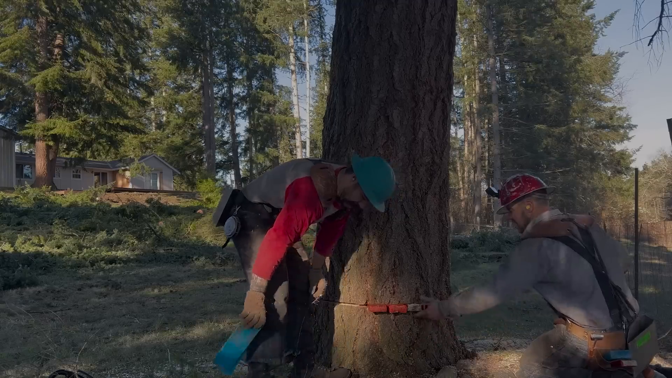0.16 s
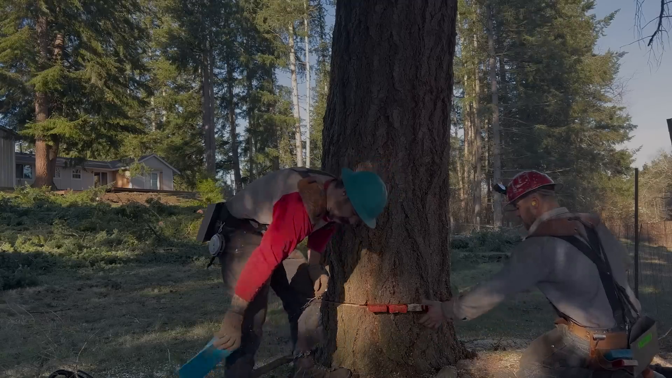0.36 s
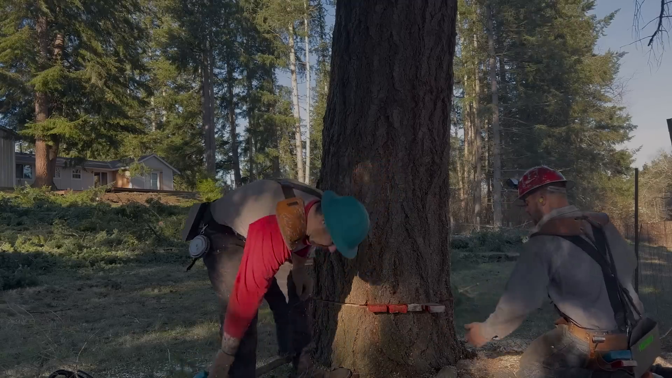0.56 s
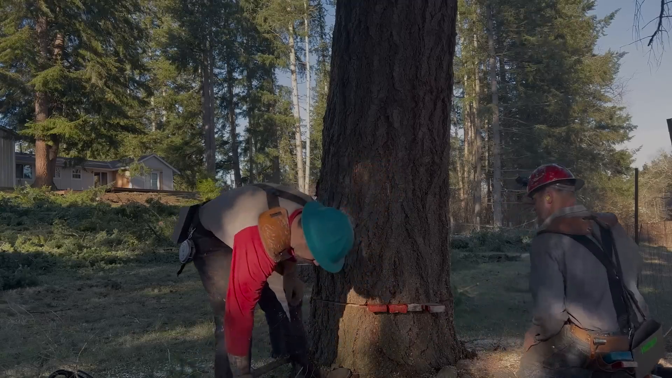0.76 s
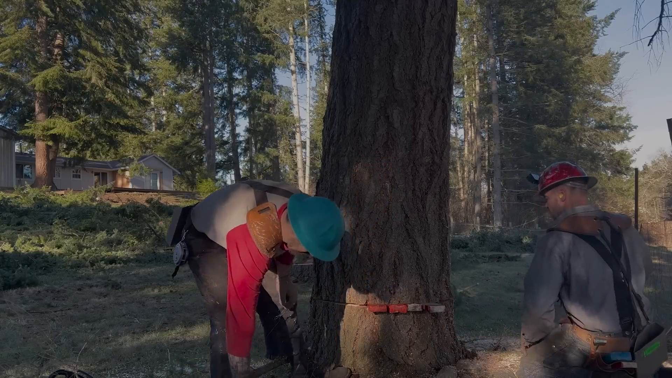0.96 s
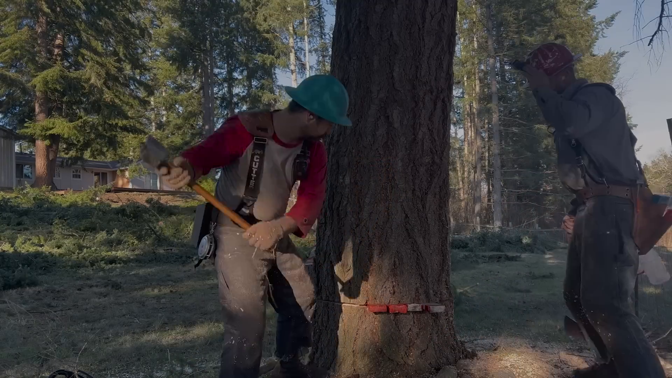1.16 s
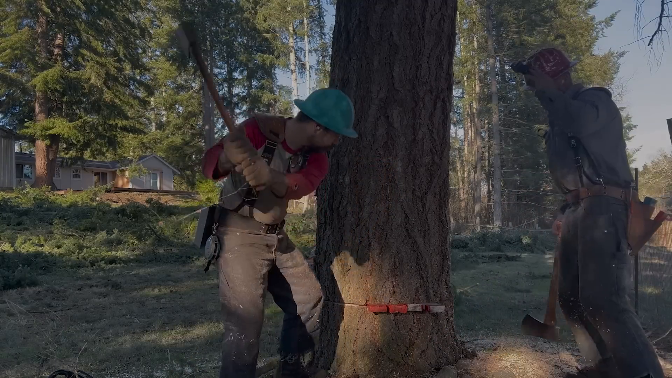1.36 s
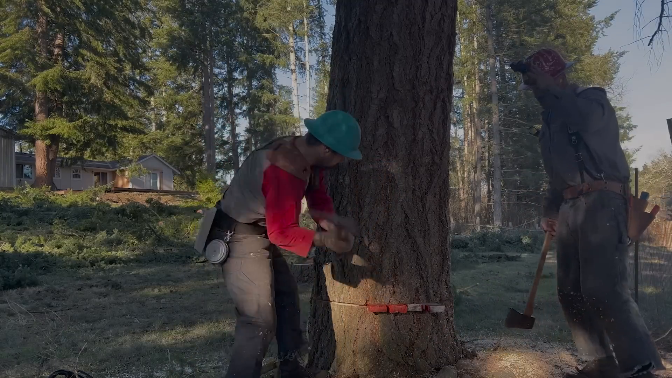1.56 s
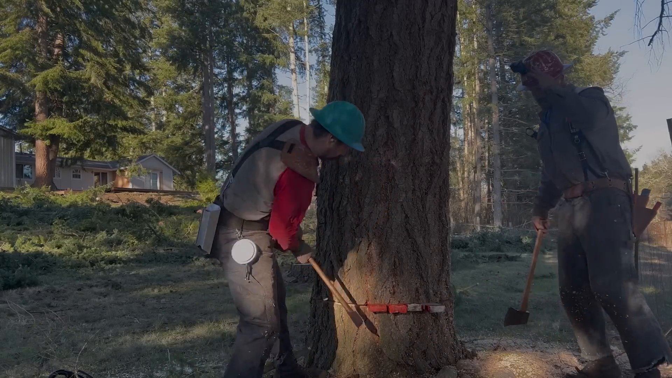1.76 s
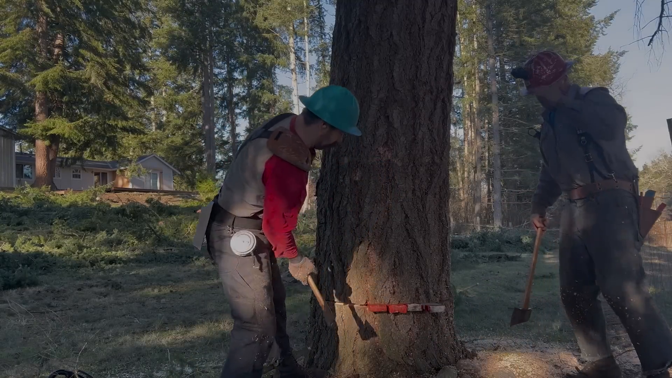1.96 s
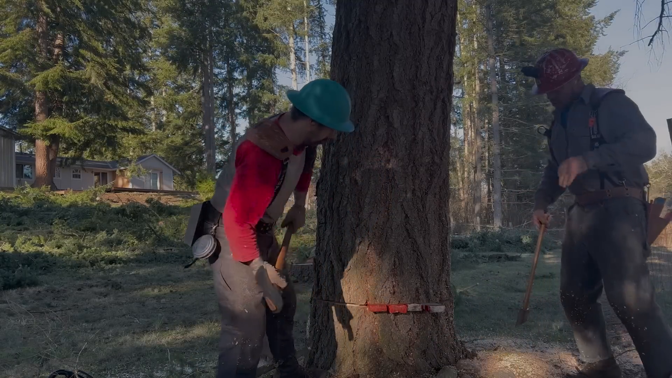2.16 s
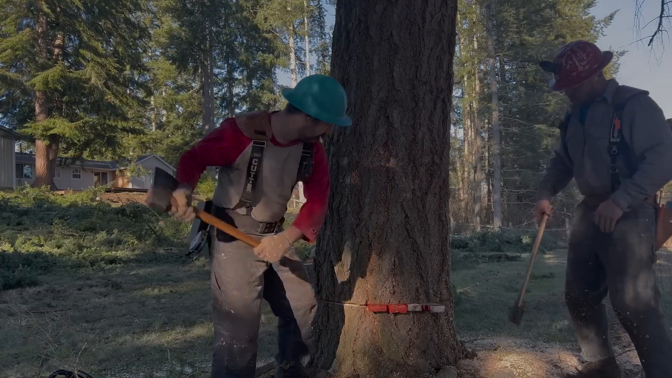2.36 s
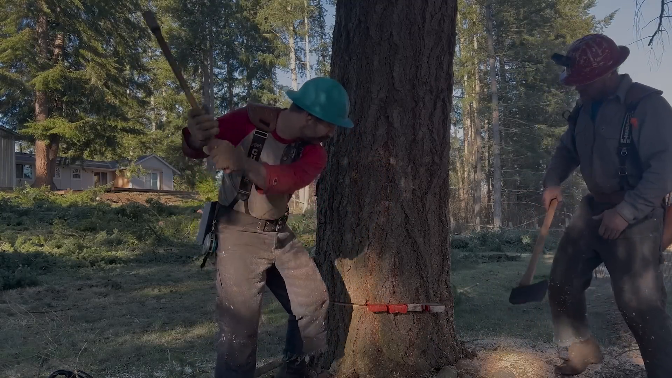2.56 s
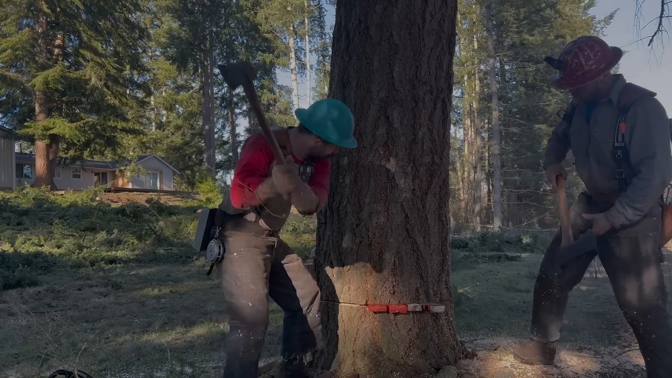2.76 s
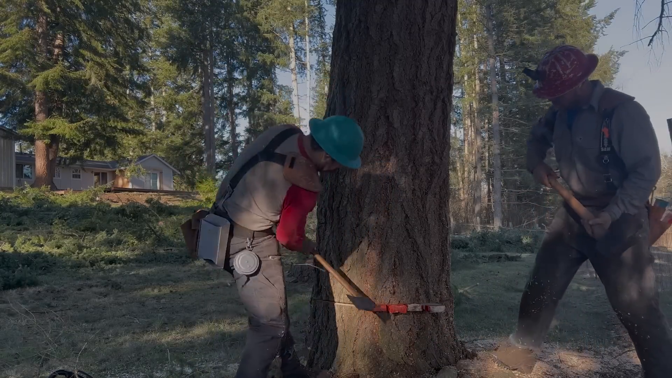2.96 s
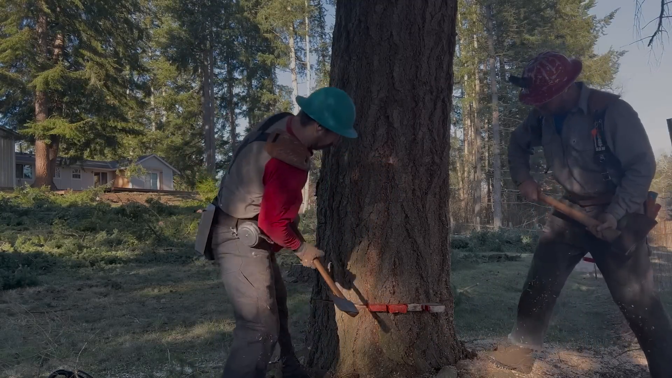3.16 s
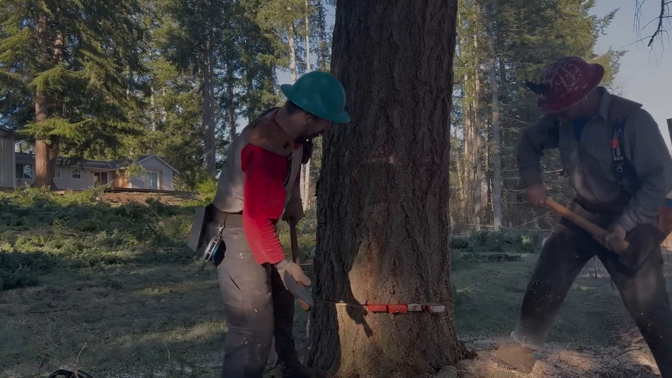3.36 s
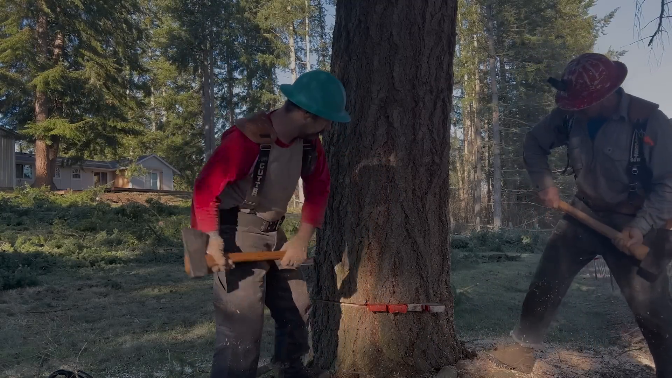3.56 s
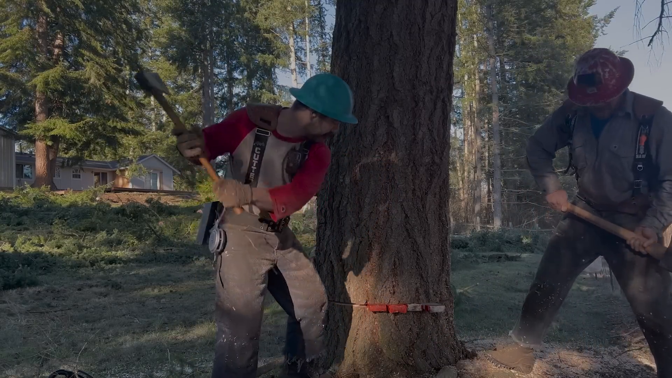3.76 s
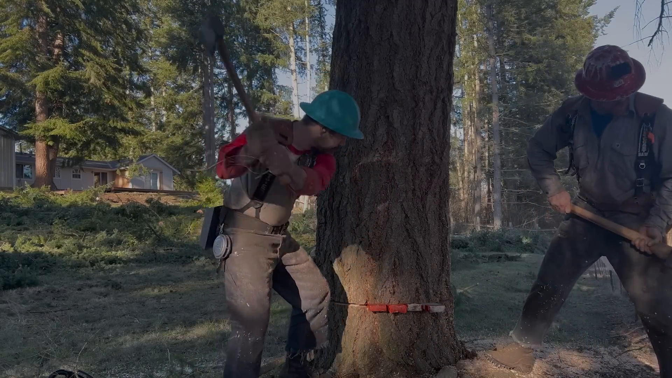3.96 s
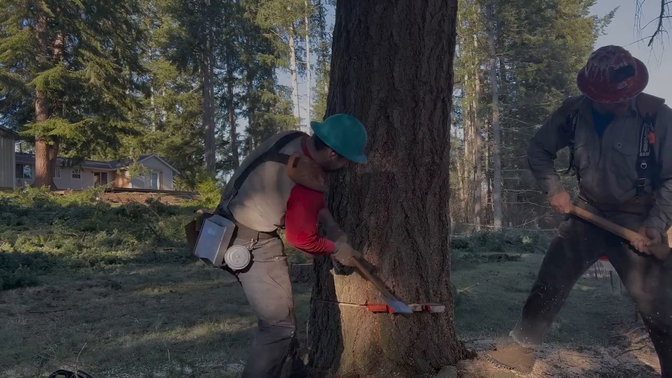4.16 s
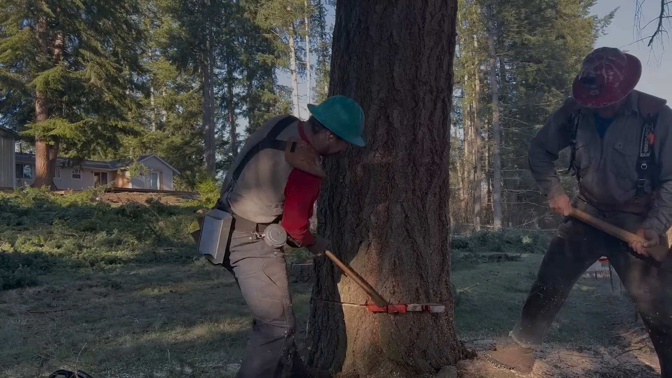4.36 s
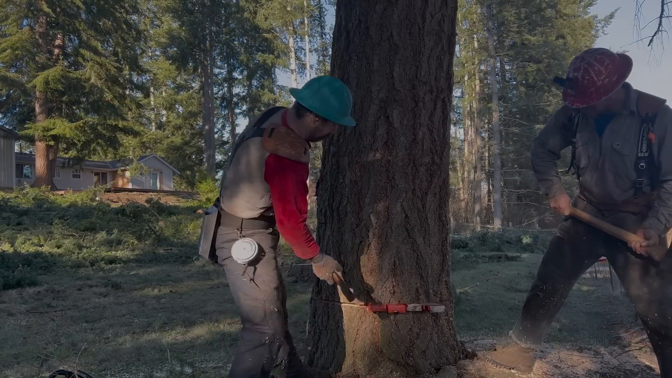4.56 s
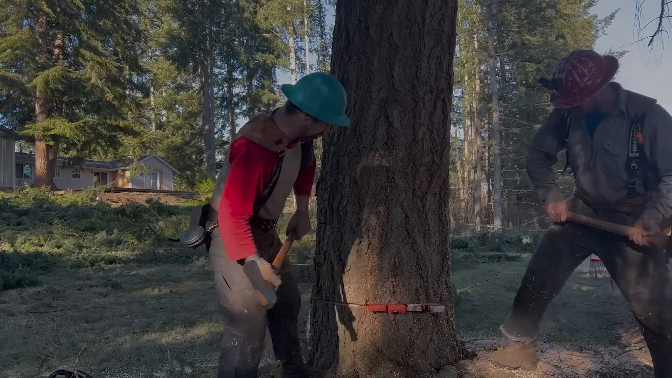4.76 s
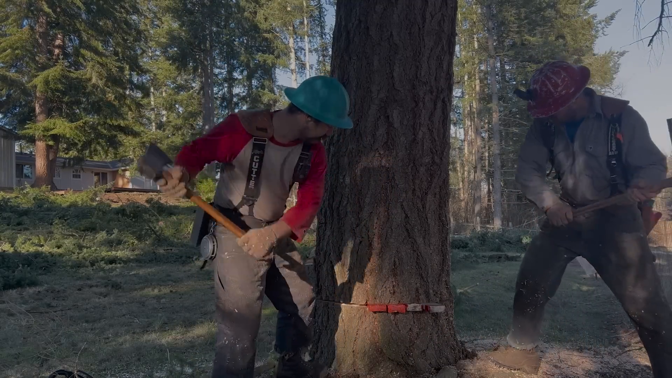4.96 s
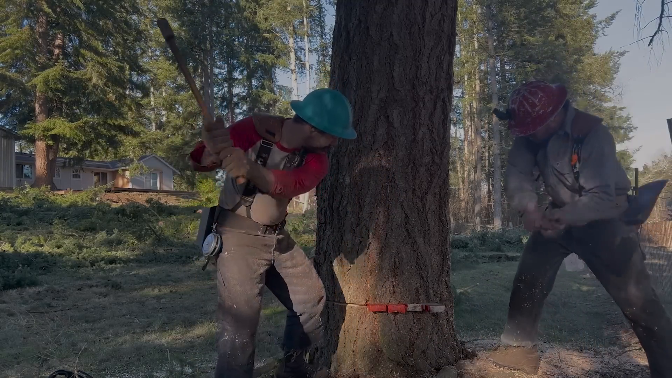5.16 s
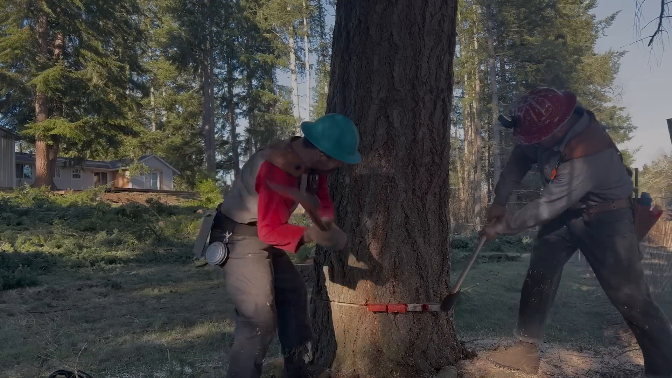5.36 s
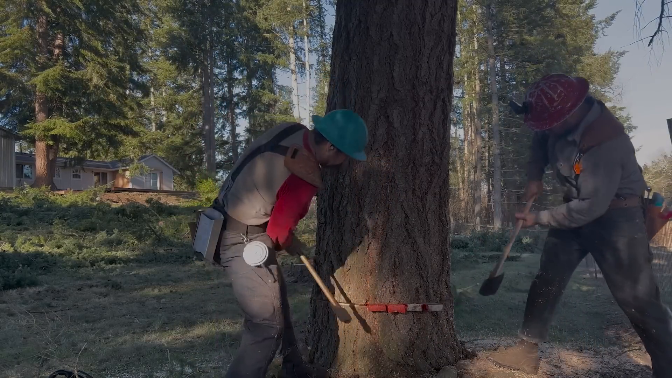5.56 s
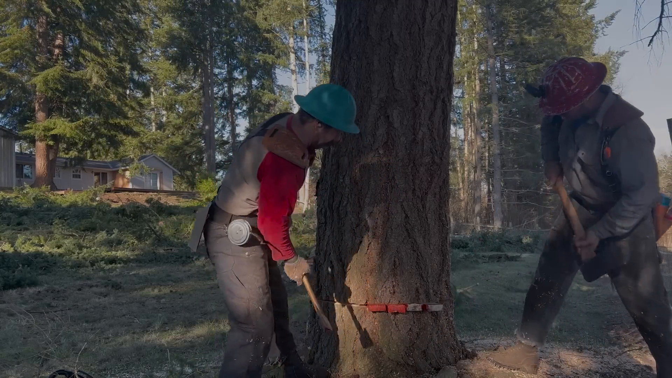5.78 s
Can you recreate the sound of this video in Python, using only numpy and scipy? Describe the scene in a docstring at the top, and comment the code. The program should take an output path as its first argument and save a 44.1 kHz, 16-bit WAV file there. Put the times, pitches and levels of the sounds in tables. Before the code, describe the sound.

Outdoors, wooden-handled axes clunk about before a woody knock runs into each of four sharp wedge strikes, with echoes returning from trees.

```python
"""Wedges driven into a standing fir

Heard in a yard ringed by forest: felling wedges are hit with the back of an axe. Four times a woody knock
(ringing modes and rattle) runs into a hard crack (steel pulse, trunk modes, echoes); one more knock falls between.
Axes and a dropped plastic wedge clunk (modes and rattle), short ticks, snaps and scuffs are clumped noise, boots
thud as short low tones, cloth swishes and a treble echo hisses in noise swells. Behind lie a low rumble, soft air
and faint hiss, all filtered noise; the rumble ends far lower than it began."""
import sys
import numpy as np
from scipy import signal
from scipy.fft import rfft, irfft
from scipy.io import wavfile
from scipy.ndimage import uniform_filter1d, map_coordinates

SR = 44100
rng = np.random.default_rng(int(sys.argv[2]) if len(sys.argv) > 2 else 0)


def transcribe(signal):
    """Save signal, clipped to [-1, 1], as a 16-bit WAV file at the path in sys.argv[1]."""
    frames = np.atleast_2d(signal).T
    limited = np.clip(frames, -1, 1)
    pcm = np.round(limited * 32767).astype(np.int16)
    wavfile.write(sys.argv[1], SR, pcm)


N = 256662  # samples, about 5.8 s

# Hard cracks of axe on wedge; the left channel is louder where pan_db is positive. Columns:
# start_s, level_db, tilt_db_per_octave, chatter_s, trunk_db, echo_db (each echo is set relative to it),
# echo_tilt_db_per_octave (the near trees add to it), pan_db (left minus right), right_lag_ms
CRACKS = [(1.68, -12.5, 2.5, 0.003, -25.5, -34.5, 2, 0, -0.038),
          (2.9615, -14.5, 2.5, 0.0014, -23, -39.5, 0.75, -1.5, -0.054),
          (4.2288, -16, 1.5, 0.0023, -21.5, -42.5, 0.2, -2, -0.061),
          (5.4955, -16.5, 1.1, 0.0026, -22.5, -39.5, -0.7, 0, -0.052)]
# Dying away of sound scattered close by, before each sound's own stretch: hz, t60_s
NEAR_DECAY = [(100, 0.51), (800, .12), (2000, 0.12), (6000, 0.14), (15000, 0.061)]
# Spectrum of fine hiss, for cloth, treble echo and the outdoor hiss: hz, level_db
HISS_COLOUR = [(500, -7.5), (3000, 2), (6000, 3), (9000, 4.5), (10500, -10), (12500, 5), (15500, 1.5),
               (16500, -15)]


def amp(db):
    """Amplitude factor of a level in dB."""
    return 10 ** (np.asarray(db) / 20)


def read(points, hz):
    """Joins points by straight lines on a log-frequency axis."""
    f, value = np.transpose(points)
    return np.interp(np.log(hz + 1), np.log(f + 1), value)


def octaves(hz):
    """Octaves above 1500 Hz, the pivot of every brightness tilt; constant below 200 Hz."""
    return np.log2(np.maximum(hz, 200) / 1500)


def seconds(size):
    """Times of the samples in seconds."""
    return np.arange(size) / SR


def blow(x, db):
    """Gives a sound the energy of 10 ms at this level."""
    energy = np.sum(np.atleast_2d(x) ** 2, 1).mean() + 1e-20
    return x * amp(db) * np.sqrt(.01 * SR / energy)


def add(mix, s, sound, pan_db=0):
    """Puts a sound into the mix at time s, louder on the left by pan_db."""
    sound = sound * amp([[pan_db / 2], [-pan_db / 2]])
    part = mix[:, max(round(s * SR), 0):][:, :sound.shape[1]]
    part += sound[:, :part.shape[1]]


def ports(x, lag_ms):
    """The sound reaches the right microphone a little later, or sooner if the lag is negative."""
    left, right = x * np.ones((2, 1))
    right_times = np.arange(len(right)) - lag_ms * SR / 1000
    return np.array([left, map_coordinates(right, [right_times])])


def noise(colour, size, likeness, tilt_db=0):
    """Coloured stereo noise of rms 1, partly alike in both channels."""
    hz = np.fft.rfftfreq(size, 1 / SR)
    shared, *own = rng.standard_normal((3, size))
    likeness = np.clip(likeness, 0, 1)
    white = np.sqrt(likeness) * shared + np.sqrt(1 - likeness) * np.array(own)
    x = irfft(rfft(white) * amp(read(colour, hz) + tilt_db * octaves(hz)), size)
    return x / x.std()


def fade(x, decay, stretch=1):
    """Lets every band die at its own speed, 60 dB in its t60 times stretch."""
    hz, t, z = signal.stft(x, SR, nperseg=256)
    t60 = stretch * read(decay, hz)[:, None]
    z = z * 1000. ** (-t / t60)
    return signal.istft(z, SR, nperseg=256)[1][:, :x.shape[1]]


def ring(modes, t, tilt_db=0, stretch=1):
    """Damped modes set going by one blow; the grain of the wood gives each a weaker, detuned partner."""
    hz, db, t60 = np.transpose(modes)[:, :, None]
    phase, other_phase, detune = rng.random((3, len(hz), 1))
    partner_hz = hz * (1 + .12 * (detune - .5))  # up to 6 % away
    main = np.sin(2 * np.pi * (hz * t + phase))
    partner = .4 * np.sin(2 * np.pi * (partner_hz * t + other_phase))
    decay = 1000. ** (-t / (t60 * stretch))
    return np.sum(amp(db + tilt_db * octaves(hz)) * (main + partner) * decay, 0)


def rise(t, time):
    """Soft onset lasting about this time in seconds."""
    return 1 - np.exp(-(t / time) ** 2)


def patchy(x, patchy_db):
    """Trunks and boughs scatter unevenly: patches in time and pitch are stronger or weaker."""
    z = signal.stft(x, SR, nperseg=512)[2]
    patches = uniform_filter1d(rng.standard_normal(z.shape[1:]), size=3, axis=0)
    patches = uniform_filter1d(patches, size=5, axis=1)
    gain = amp(patchy_db * patches / patches.std())
    return signal.istft(z * gain, SR, nperseg=512)[1][:, :x.shape[1]]


def contact(t, tilt_db, chatter_s, spread=0.001086, rebound=0.35, rebound_s=.00112):
    """The pulse of steel on a tight wedge: treble runs ahead of bass, the wedge rebounds, the faces chatter."""
    # spectrum of the steel contact: hz, level_db
    crack_colour = [(40, -24), (250, -15), (600, -4.5), (950, -7), (1250, 0), (1850, 0.5), (2500, -7.5),
                    (3400, -0.5), (4500, -15), (7500, -12.5), (10500, -24), (13500, -22), (16000, -30)]
    hz = np.fft.rfftfreq(len(t), 1 / SR)
    delay_s = 0.00043 + spread / (1 + (hz / 4500) ** 2)
    phase = 2 * np.pi * np.cumsum(delay_s) * hz[1]  # delay summed over frequency
    pulse = irfft(amp(read(crack_colour, hz) + tilt_db * octaves(hz)) * np.exp(-1j * phase))
    chatter = noise(crack_colour, len(t), 0.79, tilt_db) * rise(t, 0.00044) * np.exp(-(t / chatter_s) ** 2)
    touch = blow(pulse * np.exp(-t / .01), -1.9) + blow(chatter, 0.5)
    return touch + rebound * np.roll(touch, round(rebound_s * SR), axis=1)


def flutter(t):
    """Single trunks return the crack one after another: the level wavers from one 3 ms step to the next."""
    steps = np.arange(0, t[-1], .003)
    return np.interp(t, steps, amp(1.9 * rng.standard_normal(len(steps))))


def cracks():
    """Each crack rings the trunk, scatters off the ground, and returns from near trees, house and forest."""
    # modes of the trunk: hz, level_db, t60_s
    trunk_modes = [(62.7, -16.5, 0.15), (429.4, -2.5, 0.1), (454.4, -14.5, 0.18), (679.4, -4.5, 0.06),
                   (796, 1, 0.052), (987.4, 6.5, 0.047), (1080, -9, 0.059), (1875, -15, 0.13)]
    # spectra of ground scatter, tree echoes and house echo: hz, level_db
    ground_colour = [(40, -12), (200, -5.5), (600, -9.5), (950, 6), (1400, -4.5), (2000, -4.5),
                     (2600, -10.5), (3400, -13), (7000, -16), (11000, -24.5), (16000, -29)]
    forest_colour = [(60, -5.5), (300, -7.5), (600, -4.5), (900, 8.5), (1350, -2), (1950, 4), (2600, -6),
                     (3500, -3.5), (4500, -9.5), (6300, -13.5), (9000, -28.5), (16000, -52)]
    house_colour = [(100, -34), (500, -13), (850, 2), (1100, -6), (1400, -20), (1950, -12), (3000, -40),
                    (8000, -59.5), (16000, -71)]
    # dying away among the trees, shortened for the yard: hz, t60_s
    forest_decay = [(100, 0.99), (900, 2.3), (2000, 1.9), (4000, 1.5), (7000, 0.83), (12000, 0.54)]
    out, t, long = np.zeros((2, N)), seconds(size=16384), seconds(size=65536)
    trunk = ring(trunk_modes, t) * rise(t, 0.0071)
    for s, db, tilt_db, chatter_s, trunk_db, echo_db, echo_tilt_db, pan_db, lag_ms in CRACKS:
        ground = fade(noise(ground_colour, len(t), 0.71, tilt_db), NEAR_DECAY, 0.91) * rise(t, .004)
        near = blow(contact(t, tilt_db, chatter_s), db) + blow(trunk, trunk_db) + blow(ground, db - 10.0)
        add(out, s, ports(near, lag_ms), pan_db)

        trees = noise(forest_colour, len(t), 0.12, echo_tilt_db + 3.5)
        trees = trees * rise(t, 0.0062) * np.exp(-t / 0.032)
        add(out, s + .086, blow(patchy(trees * flutter(t), 1.5), echo_db - 4))

        house = noise(house_colour, len(t), .5, echo_tilt_db) * rise(t, .004) * np.exp(-t / .032)
        add(out, s + .218, blow(patchy(house, 2), echo_db + .5))

        yard = noise(forest_colour, len(long), 0.14, echo_tilt_db)
        yard = fade(yard, forest_decay, 0.8) * rise(long, 0.016)
        add(out, s, blow(patchy(yard * flutter(long), 1.5), echo_db + 1.5))

        forest = noise(forest_colour, len(long), 0.03, echo_tilt_db)
        forest = fade(forest, forest_decay) * rise(long, 0.037)
        add(out, s + .195, blow(patchy(forest * flutter(long), 1.5), echo_db + .5))
    return out


def knocks():
    """A wedge or the axe rings over a dense rattle of wood modes, with a faint wash from the yard."""
    # woody knocks: start_s, level_db, tilt_db_per_octave, ring_stretch (factor), struck (index),
    # pan_db (left minus right), right_lag_ms
    knock_events = [(1.655, -23.5, -3, 0.99, 0, 0, 0.15), (2.9047, -12.5, 0.5, 1.28, 0, 2.5, 0.099),
                    (3.5009, -29.5, -1.5, 1.24, 2, 3, 0.12), (4.1476, -17.5, -1, 1.56, 0, 2, .1),
                    (5.3804, -12, 2, 0.67, 1, -1.5, -0.054)]
    # modes of one wedge in its cut, the other wedge, the axe itself; before stretch: hz, level_db, t60_s
    struck_modes = [
        [(275, -15, .08), (536, -6, .16), (640, -7, .08), (722, -3, .15), (830, -4, .08), (1000, -3, .1),
         (1448, -7, .11), (1798, -3, .085), (1940, -6, .1), (2530, 4, .07), (2860, -4, .08), (3250, -10, .07),
         (4920, -9, .06), (5530, -12, .05), (7150, -18, .06)],
        [(190, -5, .06), (246, 3.5, .09), (382, -15, .11), (632, -7, .1), (820, -4, .2), (985, -3, .15),
         (1134, 1, .15), (1280, 0, .07), (1420, -5, .09), (1585, -2, .08), (1655, 0, .08), (1824, -3, .07),
         (2191, -1, .12), (3050, -1, .07), (4167, -7, .07)],
        [(571, -13, .38), (716, -5, .16), (880, 1, .11), (1136, -7, .13), (1760, -3, .11), (2557, -5, .11)],
    ]
    # spectrum of the wood rattle: hz, level_db
    knock_colour = [(40, -30.5), (170, -21.5), (400, -12), (700, 2.5), (1100, -1), (1900, -2.5), (3000, -6),
                    (4500, -13.5), (7500, -16.5), (10000, -25), (12500, -15.5), (16000, -29.5)]
    out, t = np.zeros((2, N)), seconds(size=16384)
    for s, db, tilt_db, stretch, struck, pan_db, lag_ms in knock_events:
        tone = ring(struck_modes[round(struck)], t, tilt_db, stretch) * rise(t, 0.0017)
        wood = fade(noise(knock_colour, len(t), 0.74, tilt_db), NEAR_DECAY, stretch) * rise(t, 0.00054)
        wood = wood * (1 + 1.8 * np.exp(-t / 0.0041))  # the direct sound stands above its scatter
        add(out, s, ports(blow(tone, db - 2.2) + blow(wood, db - 3.8), lag_ms), pan_db)
        wash = noise(knock_colour, len(t), 0.2, tilt_db - 4.5) * rise(t, 0.006) * np.exp(-t / 0.04)
        add(out, s, blow(wash, db - 15.5))
    return out


def clunk(t, tilt_db, stretch, pitch):
    """One contact of a handled tool: ringing modes and a short woody rattle."""
    # modes shared by all clunks, before pitch and stretch: hz, level_db, t60_s
    tool_modes = [(342, -16, 0.84), (672.6, -4, 0.29), (813, -11, 0.33), (964, -3.5, 0.32),
                  (1614, -13.5, 0.36), (1853, 3, 0.14), (2230, -11, 0.2), (2550, -13, .1),
                  (2700, -7.5, 0.14), (3940, -8, 0.12)]
    # spectrum of the rattle: hz, level_db
    clunk_colour = [(100, -3.5), (500, 3), (950, 10), (1250, 5), (1850, 9.5), (3200, -10.5), (5000, -11.5),
                    (8000, -25.5), (16000, -59)]
    rattle = fade(noise(clunk_colour, len(t), 0.19, tilt_db), NEAR_DECAY, stretch)
    tone = ports(ring(tool_modes, t * pitch, tilt_db, stretch), lag_ms=0.11)  # higher pitch also dies faster
    return (blow(tone, -3.5) + blow(rattle, -3)) * rise(t, .0007)


def tick(t, tilt_db, t60):
    """A short tick, snap or scuff: a decaying noise in clumps of tiny breaks."""
    # spectrum of the ticks: hz, level_db
    tick_colour = [(100, 8), (1000, 8.5), (2800, 0), (6000, -6), (10000, -18.5), (14000, -20.5),
                   (16000, -28)]
    clumps = uniform_filter1d(rng.exponential(1, len(t)) ** 2, size=40)
    return noise(tick_colour, len(t), .6, tilt_db) * clumps * 1000. ** (-t / t60)


def handling():
    """Axes and a dropped plastic wedge clunk, some bouncing; short ticks, snaps and scuffs; boots thud on turf."""
    # tools handled: start_s, level_db, tilt_db_per_octave, ring_stretch (factor), pitch (factor), bounces (count)
    clunk_events = [(0.1916, -31, 1, 0.22, 0.79, 0), (.277, -44.5, 3.5, 1.1, 1.55, 0),
                    (.479, -46, 5, 1.5, 1.4, 0), (0.557, -44, 0, 0.39, 1.06, 0),
                    (0.7412, -25, 3, 0.78, 0.97, 1), (.987, -32.5, 2, 1.25, 0.96, 0),
                    (0.9983, -26.5, 1.5, 0.55, 0.98, 2), (1.167, -43.5, -3, 0.26, .87, 0),
                    (2.409, -35.5, -8, 0.079, 0.92, 0), (3.689, -45, 2, 1.3, 1, 1),
                    (4.874, -50, -5.5, 0.52, 0.88, 0)]
    # short ticks, snaps and scuffs (a dropped plastic thing, twigs, bark, a boot):
    # start_s, level_db, tilt_db_per_octave, t60_s
    tick_events = [(0.187, -42.5, 13.5, 0.07), (.612, -53, 1.5, 0.084), (.683, -40, 3, 0.54),
                   (0.735, -41.5, 6.5, 0.092), (.803, -48.5, -1.5, 0.046), (2.407, -51.5, 16.5, .025),
                   (3.138, -47, 2, 0.14), (4.084, -57, -2, .11)]
    # boots shifting: start_s, level_db, pitch_hz
    thud_events = [(.721, -42, 300), (0.97, -42.5, 277), (1.139, -41.5, 177), (1.622, -39, 132),
                   (2.245, -37.5, 89), (2.612, -41, 98)]
    bounce_s, bounce_db = 0.018, -4.5  # a loose tool strikes again, each time weaker
    out, t = np.zeros((2, N)), seconds(size=16384)
    for s, db, tilt_db, stretch, pitch, bounces in clunk_events:
        for k in range(round(bounces) + 1):
            add(out, s + k * bounce_s, amp(db + k * bounce_db) * clunk(t, tilt_db, stretch, pitch))
    for s, db, tilt_db, t60 in tick_events:
        add(out, s, blow(tick(t, tilt_db, t60), db))
    for s, db, hz in thud_events:
        cycles = hz * t
        thud = np.sin(2 * np.pi * cycles) * cycles * np.exp(-cycles / 0.51)
        add(out, s, blow(thud, db))
    return out


def cloth_and_treble_echo():
    """Cloth swishes as the axe is lifted and drawn back; a treble echo hisses after each crack."""
    # lift, treble echo and drawing back around every crack:
    # after_crack_s, level_db (relative to the air curve), width_s
    swishes = [(-.41, -15, .09), (.02, -11.5, 0.086), (.4, -18.5, .13)]
    t = seconds(N)
    swells = np.zeros(N)
    for crack in CRACKS:
        for after, db, width in swishes:
            swells += amp(db) * np.exp(-((t - crack[0] - after) / width) ** 2)
    air_db = outdoor_db(t)[1]
    return noise(HISS_COLOUR, N, 0.43, tilt_db=-1.3) * swells * amp(air_db)


def outdoor_db(t):
    """Level curves of the rumble and of the air at times t."""
    # outdoor level curves, before the trims in background(): time_s, rumble_db, air_db
    levels = [(0, -51.5, -53.5), (.8, -50.5, -50), (2.921, -48.5, -51.5), (3.05, -56.5, -57.5),
              (4.02, -60.5, -60.5), (5.15, -63.5, -64.5), (5.82, -67, -57.5)]
    s, *columns = np.transpose(levels)
    return [np.interp(t, s, c) for c in columns]


def background():
    """Lumpy low rumble, soft air in the trees and a faint hiss that follows the air curve."""
    # spectra of rumble and air: hz, level_db
    rumble_colour = [(10, -56.5), (22, -35), (35, -14), (60, 2), (95, -1), (150, -6.5), (250, -14),
                     (450, -24.5), (1000, -53.5)]
    air_colour = [(60, -3.5), (250, 0.5), (600, 3), (1000, -2), (2000, -11.5), (3500, -24.5), (7000, -36),
                  (16000, -57.5)]
    hiss_db = -21  # relative to the air curve
    rumble_db, air_db = outdoor_db(seconds(N))
    lumps = np.interp(seconds(N), np.arange(240) / 40, rng.standard_normal(240))  # 40 random points a second
    rumble = noise(rumble_colour, N, 0.22) * amp(rumble_db + 2.3 * lumps + 1.5)
    air = patchy(noise(air_colour, N, 0.063), 0.5) * amp(air_db + 0.43 * lumps - 3.0)
    hiss = noise(HISS_COLOUR, N, 0.45) * amp(air_db + hiss_db)
    return rumble + air + hiss


def scene():
    """All sounds of the yard together."""
    return knocks() + cracks() + handling() + background() + cloth_and_treble_echo()


def record(dry):
    """The loudest peaks are rounded off; then a steep low-pass limits the band."""
    cutoff_hz = 16100
    rounded = dry / (1 + abs(dry / .88) ** 5) ** (1 / 5)
    lowpass = signal.firwin(511, cutoff_hz, window=("kaiser", 9), fs=SR)
    return signal.oaconvolve(rounded, lowpass[None], "same")


dry = scene()
out = record(dry)
transcribe(out)
```